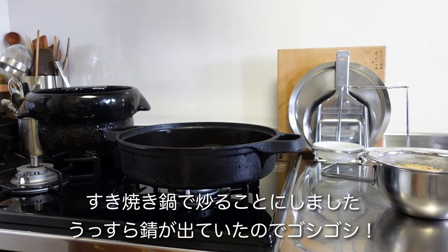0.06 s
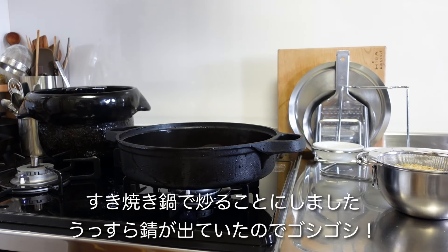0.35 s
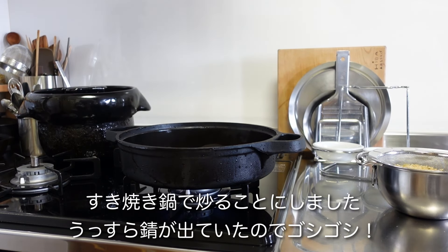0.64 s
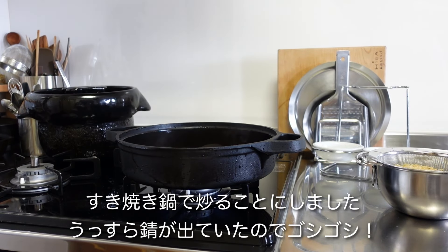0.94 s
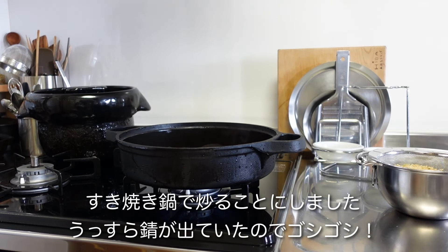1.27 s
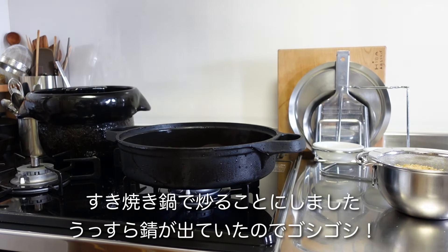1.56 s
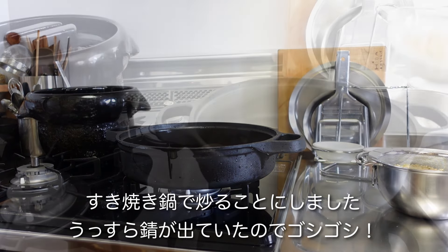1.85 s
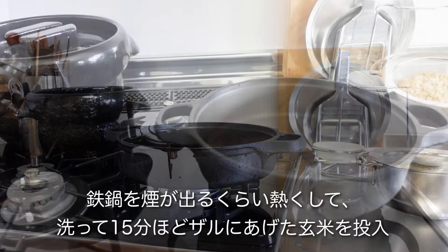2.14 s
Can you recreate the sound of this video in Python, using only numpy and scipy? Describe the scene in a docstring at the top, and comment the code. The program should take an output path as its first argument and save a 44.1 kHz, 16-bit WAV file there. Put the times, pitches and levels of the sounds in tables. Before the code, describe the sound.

An igniter snaps rapidly, burner and extractor hood roar softly, and wet rice tipped from a steel strainer builds to a loud sizzle.

```python
"""A knob clicks, gas hisses softly and an igniter snaps 7.5 times a second: a gas hob in a small
kitchen, heard from close by on a pair of microphones. Abruptly burner and extractor hood are roaring.
Just right of centre, wet rice rattles out of a ringing steel strainer into a hot iron pot, where the
water on the grains bursts into steam and builds up to a loud sizzle."""
import sys
import numpy as np
from scipy import signal
from scipy.fft import rfft, irfft, next_fast_len
from scipy.io import wavfile
from scipy.ndimage import uniform_filter1d

SR = 44100
rng = np.random.default_rng(int(sys.argv[2]) if len(sys.argv) > 2 else 0)


def store_wav(level_fs):
    """Save 16-bit WAV to argv[1]."""
    pcm = np.round(np.clip(np.atleast_2d(level_fs), -1, 1) * 32767)
    wavfile.write(sys.argv[1], SR, pcm.T.astype(np.int16))


N = 257103
TIME = np.arange(N) / SR
LEFT_RIGHT = np.array([[1], [-1]])
ROAR_START_S = 2.139

# clumps of wet rice landing on hot iron: start_s, level_db
RICE_CLUMPS = [(3.85, -37), (3.96, -41), (4.075, -43.5), (4.235, -42.5), (4.29, -44)]
# spectrum of the bursting steam bubbles: pitch_hz, level_db
SIZZLE_SPECTRUM = [(150, -49), (400, -30), (700, -15), (1000, -11.5), (1500, -9.5), (1900, -7.5),
                   (2300, -9), (2700, -6.5), (3700, -3), (5200, -1), (7000, -3), (10000, -8),
                   (13000, -16.5), (16000, -29.5)]
# sizzle treble against its lows, dulled at last by the growing heap: time_s, tilt_db
SIZZLE_TILT = [(3.9, 1), (4.3, 4.5), (4.95, 1), (5.3, -3.5)]
# resonances of the iron pot: pitch_hz, width_hz, lift_db
POT_MODES = [(435, 40, 5), (1238, 65, 9.5), (1674, 32, 8.5), (1780, 60, 3), (2600, 70, 3), (2930, 70, 3),
             (3187, 35, 4), (3346, 28, 6), (3526, 28, 6.5), (3755, 45, 5), (3912, 30, 6.5), (4086, 22, 5.5),
             (4258, 40, 3), (4454, 35, 3.5), (5124, 40, 4), (5335, 55, 4), (5669, 40, 3), (5849, 25, 3),
             (7603, 30, 4), (8708, 45, 3)]
# the pot's place between the microphones: pitch_hz, left_minus_right_db
POT_BALANCE = [(300, -1), (2400, -0.5), (4400, -1.5), (8000, -2), (14000, 3)]
# jolts that send rice out of the strainer: start_s, knock_db, flow_db, rise_s, hold_s, t60_s
STRAINER_JOLTS = [(3.83, -47, -30.5, 0.025, 0.021, 0.37), (4.202, -52, -33, 0.0098, .003, .11),
                  (4.314, -59, -40.5, 0.0052, .003, .08)]
# modes of the steel strainer: pitch_hz, level_db, t60_s
STRAINER_MODES = [(760, -3, .15), (1264, -5, .3), (2733, 1, .28), (2787, 2, .3), (3020, -3, .25),
                  (3377, 0, .25), (3472, -1, .2), (3546, -1, .2), (3750, -3, .2), (4008, 1, .25),
                  (4143, 2, .3), (4450, -2, .2), (5103, 0, .3), (6146, -2, .22), (6567, -2, .22),
                  (7360, -1, .22), (7800, -6, .2), (8705, -3, .2), (9150, -4, .2), (10200, -7, .15),
                  (12000, -13, .12)]
# spectrum of rice rattling over steel: pitch_hz, level_db
RATTLE_SPECTRUM = [(290, -50), (500, -17), (761, -11), (1160, -10), (1280, 1), (1440, -8), (2070, -3),
                   (4030, -1), (4400, -4.5), (8960, -1), (16000, -17.5)]
# near echoes of a spark off hob top and pot: delay_s, level_db
SPARK_ECHOES = [(.00041, -.5), (.0031, -13), (.0067, -11)]
# the crack a spark sends into the room: pitch_hz, level_db
SPARK_SPECTRUM = [(150, -45), (450, -39), (750, -21), (1050, -17), (1400, -9.5), (2400, -5.5), (3300, -1.5),
                  (4300, 2), (5400, 2.5), (6600, 1), (8500, 0), (11000, -1.5), (16000, -10)]
# bright clicks of the knob and its catch: start_s, level_db, t60_s
KNOB_CLICKS = [(.022, -58, 0.089), (.111, -55.5, 0.025), (.128, -61, .1), (0.1466, -42.5, 0.063),
               (.280, -35, 0.0057), (.41, -31.5, 0.011)]
# dull knocks of valve and cookware: start_s, level_db, highest_hz, t60_s
DULL_KNOCKS = [(.022, -52, 3700, .16), (.150, -56, 2000, 0.14), (.195, -47.5, 2600, 0.075),
               (.41, -55.5, 1350, .2), (.457, -49.5, 1600, 0.23), (.577, -47.5, 1540, 0.062),
               (.586, -56, 450, 0.03), (1.269, -63, 2000, .2), (1.339, -53.5, 2500, 0.36),
               (1.383, -50.5, 2250, 0.14), (2.251, -48.5, 1800, 0.21), (3.677, -46, 3000, .034),
               (5.527, -48, 440, .058), (5.695, -46, 486, 0.081)]
# faint clink of metal as the roar sets in: pitch_hz, level_db, t60_s
CLINK_MODES = [(2870, -54, 0.23), (3720, -55, 0.16)]
# light scuffs of steel and grain: peak_s, level_db, pitch_hz, width_hz, rise_s, t60_s
SCUFFS = [(1.578, -54, 6800, 1100, .0084, 0.24), (1.572, -66, 5960, 8500, 0.0054, 0.49),
          (2.275, -61.5, 6100, 5200, 0.0092, 0.23), (2.828, -59, 5500, 2800, 0.0086, 0.15),
          (3.705, -57.5, 6000, 4500, 0.011, 1), (3.745, -44.5, 5280, 2100, 0.014, .41),
          (4.363, -38, 6770, 700, .002, 0.037), (4.605, -43, 9050, 4700, 0.018, 0.19)]
# spectrum of flame and extractor hood: pitch_hz, level_db
ROAR_SPECTRUM = [(25, -30), (48, -32), (65, -5.5), (90, -0.5), (150, -0.5), (200, -6), (420, -2),
                 (1150, -0.5), (1700, -5.5), (3000, -11), (4500, -17.5), (7000, -25.5), (10000, -45),
                 (16000, -71)]
# resonances in the roar: pitch_hz, width_hz, lift_db
ROAR_MODES = [(149, 9.5, 6), (414, 19, 8), (669, 19, 7), (837, 19, 9), (1038, 73, 4), (1226, 96, 4.5)]
# loudness of the unlit gas at the jet: time_s, level_db
GAS_LEVEL = [(0, -69.5), (.3, -67.5), (1.5, -65.5), (2.13, -71.5)]
# spectrum of the gas hiss: pitch_hz, level_db
GAS_SPECTRUM = [(300, -51), (900, -9), (1600, -1.5), (2500, -3), (3500, 3.5), (5200, 2.5), (7000, -4),
                (9000, -25), (11000, -18), (16000, -32)]
# whistles of the jet: pitch_hz, width_hz, lift_db
GAS_WHISTLES = [(1100, 170, 9), (2080, 130, 4), (2630, 130, 8), (3330, 120, 9.5), (3740, 130, 9),
                (4544, 69, 9), (4750, 90, -1), (5600, 120, 3), (11100, 220, 7)]
# room tone of the quiet kitchen: pitch_hz, level_db
ROOM_TONE_SPECTRUM = [(25, -24), (60, -10), (110, 2.5), (250, 1.5), (700, 4), (2000, -3), (6000, -4.5),
                      (16000, -17)]
# reverberation time of the kitchen: pitch_hz, t60_s
KITCHEN_DECAY = [(150, 0.67), (1300, 0.4), (3500, 0.3), (9000, .3), (15000, 0.2)]
# stereo width at the microphone pair: pitch_hz, side_against_mid_db
STEREO_WIDTH = [(60, -44), (130, -25), (300, -14.5), (700, -13.5), (1500, -12), (2500, -13), (4400, -10),
                (8000, -6.5), (15000, -3)]


def sizzle(tail, split_hz=5000, spits_db=-5, spits_fade_db_per_s=7.5):
    """Countless steam bubbles burst under the rice, with single spits, all coloured by the pot."""
    bubbles = stereo_grains(20000, spread_db=3.0, side_db=-6.5)
    fizz = rms_one(colour(bubbles, SIZZLE_SPECTRUM, POT_MODES))
    pops = in_room(grains(350, spread_db=2.4), tail, wet_db=-1.0)
    spits = rms_one(colour(pops, SIZZLE_SPECTRUM, POT_MODES))
    frying_s = np.maximum(TIME - RICE_CLUMPS[0][0], 0)
    spits_gain = from_db(spits_db - spits_fade_db_per_s * frying_s)   # loose drops are used up
    boil = steam_rate() * (fizz + spits_gain * spits)
    lows = signal.sosfiltfilt(signal.butter(1, split_hz, fs=SR, output="sos"), boil)
    tilt = from_db(in_time(SIZZLE_TILT) / 2)
    return lows / tilt + (boil - lows) * tilt


def steam_rate(boil_s=4.697, boil_db=-29, rise_s=0.095, ease_db_per_s=3):
    """Boiling as a gain: each clump flares up, then the whole heap boils and eases as it dries."""
    flares = [from_db(db) * swell(s, rise_s=0.016, hold_s=0.032, t60_s=1) for s, db in RICE_CLUMPS]
    since = TIME - boil_s
    heap = from_db(boil_db - ease_db_per_s * since) / (1 + np.exp(-since / rise_s))
    return np.sqrt(heap ** 2 + sum(flare ** 2 for flare in flares))


def strainer(tail, rattle_db=-3.0, rub_db=-14.0):
    """At each jolt grains rattle into the pot; they and the knock ring the strainer's steel."""
    flow = sum(from_db(db) * swell(s, rise, hold, t60) for s, _, db, rise, hold, t60 in STRAINER_JOLTS)
    rice = stereo_grains(9000, spread_db=0.5, side_db=-2.5)
    rattle = flow * rms_one(colour(rice, RATTLE_SPECTRUM))
    taps = impulses([jolt[:2] for jolt in STRAINER_JOLTS])
    flow_rms = np.sqrt(np.mean(flow ** 2))
    steel = 0
    for hz, db, t60 in STRAINER_MODES:
        # many small impacts keep each mode sounding in proportion to the flow
        rubbed = flow_rms * rms_one(ring(flow * grains(3000, spread_db=3.0), hz, t60))
        struck = ring(taps, hz, t60) * rng.choice([-1, 1])
        steel += from_db(db) * (from_db(rub_db) * rubbed + struck)
    return from_db(rattle_db) * rattle + in_room(steel, tail, wet_db=-12.0)


def igniter(tail, first_s=.2724, period_s=.13213, count=9, sag_db_per_s=1.95):
    """Each spark arrives as a sharp pressure pulse with near echoes; the room gets a broader crack."""
    sparks = impulses([(first_s + s, -20.5 - sag_db_per_s * s) for s in period_s * np.arange(count)])
    bright_snap = -band(sparks, low_hz=3270, high_hz=10100)
    low_crack = from_db(-12.5) * band(sparks, low_hz=920, high_hz=1850)
    snap = bright_snap + low_crack
    echoes = sum(from_db(db) * np.interp(TIME - delay, TIME, snap) for delay, db in SPARK_ECHOES)
    room = reverberation(colour(sparks, SPARK_SPECTRUM), tail)
    return from_db(8.0) * (snap + echoes) + from_db(13.5) * room


def knocks(tail, click_band_hz=(2300, 8600), knock_low_hz=186):
    """Knob, valve and cookware click, knock and clink close by, and the kitchen carries them on."""
    bright = sum(clatter(s, db, *click_band_hz, t60) for s, db, t60 in KNOB_CLICKS)
    dull = sum(clatter(s, db, knock_low_hz, high_hz, t60) for s, db, high_hz, t60 in DULL_KNOCKS)
    clink = sum(ring(impulses([(ROAR_START_S, db)]), hz, t60) for hz, db, t60 in CLINK_MODES)
    return in_room(bright + dull + clink, tail, wet_db=-2.5)


def clatter(start_s, db, low_hz, high_hz, t60):
    """One short dead knock: its many close modes blur into a fading band of noise."""
    t = TIME[:SR // 4]
    fade = from_db(-60 * t / t60)
    burst = rms_one(band(rng.standard_normal(len(t)) * fade, low_hz, high_hz, order=3))
    burst *= from_db(db) * np.sqrt(np.mean(fade ** 2))
    start, out = int(start_s * SR), np.zeros(N)
    out[start:start + len(t)] = burst[:N - start]
    return out


def scuffs():
    """Brief rubs of steel and grain each swell in one resonance and die away."""
    out, noise = np.zeros((2, N)), diffuse()
    for peak_s, db, hz, width, rise, t60 in SCUFFS:
        span = slice(int((peak_s - .1) * SR), int((peak_s + .5) * SR))
        t = TIME[span] - peak_s
        shape_db = np.where(t < 0, -4 * (t / rise) ** 2, -60 * t / t60)
        low_hz = np.hypot(hz, width / 2) - width / 2
        out[:, span] += from_db(db + shape_db) * rms_one(band(noise[:, span], low_hz, low_hz + width))
    return out


def burner_and_hood(steady_db=-51, surge_db=4.5, settle_s=0.13, hiss_db=-56, hiss_settle_s=0.044):
    """Flame and extractor hood roar in with a surge and settle; the fresh flame hisses briefly."""
    since = np.maximum(TIME - ROAR_START_S, 0)
    roar = rms_one(colour(diffuse(side_db=-0.5), ROAR_SPECTRUM, ROAR_MODES))
    roar_gain = from_db(steady_db + surge_db * np.exp(-since / settle_s))
    hiss = rms_one(band(diffuse(), low_hz=4200, high_hz=9900))
    hiss_gain = from_db(hiss_db) / (1 + (since / hiss_settle_s) ** 1.24)
    return (TIME > ROAR_START_S) * (roar_gain * roar + hiss_gain * hiss)


def gas_jet():
    """Unlit gas hisses and whistles softly through the jet until the roar starts."""
    hiss = rms_one(colour(diffuse(), GAS_SPECTRUM, GAS_WHISTLES))
    return (TIME <= ROAR_START_S) * from_db(in_time(GAS_LEVEL)) * hiss


def room_tone(level_db=-77.5):
    """The quiet kitchen, all round the microphones."""
    return from_db(level_db) * rms_one(colour(diffuse(), ROOM_TONE_SPECTRUM))


def kitchen_tail():
    """The room's answer to a click, with unit energy; the treble dies first."""
    size = SR // 2
    t, hz = TIME[:size], np.arange(size // 2 + 1) * SR / size
    noise, tail = rfft(diffuse(size=size, side_db=0.5)), 0
    for centre, t60 in KITCHEN_DECAY:
        share = at_hz([(f, f == centre) for f, _ in KITCHEN_DECAY], hz)
        tail += irfft(noise * share, size) * from_db(-60 * t / t60)
    spectrum = rfft(tail)
    power = uniform_filter1d(np.mean(np.abs(spectrum) ** 2, axis=0), size=21)
    even_tail = irfft(spectrum / np.sqrt(power), size)   # the room's many modes favour no pitch
    return rms_one(even_tail * (t > .001) * (t < .45)) / np.sqrt(size)


def reverberation(x, tail):
    """What the room gives back to the two microphones."""
    return signal.fftconvolve(np.atleast_2d(x), tail, axes=1)[:, :N]


def in_room(x, tail, wet_db):
    """Direct sound plus reverberation."""
    return x + from_db(wet_db) * reverberation(x, tail)


def diffuse(size=N, side_db=0):
    """Noise from all round at two close microphones: alike in the bass, less so in the treble."""
    mid, side = rng.standard_normal((2, size))
    return rms_one(mid + from_db(side_db) * LEFT_RIGHT * colour(side, STEREO_WIDTH))


def stereo_grains(per_s, spread_db, side_db):
    """Impulses from all over the pot's floor reach the two microphones a little differently."""
    mid, side = grains(per_s, spread_db), grains(per_s, spread_db)
    return mid + from_db(side_db) * LEFT_RIGHT * colour(side, STEREO_WIDTH)


def grains(per_s, spread_db):
    """Tiny random impulses, a few stronger than the rest."""
    sizes = from_db(spread_db * np.minimum(rng.exponential(1, N), 4)) * rng.choice([-1, 1], N)
    return rms_one(sizes * (rng.random(N) < per_s / SR))


def impulses(rows):
    """One impulse for each row of start_s, level_db."""
    out = np.zeros(N)
    for s, db in rows:
        out[int(s * SR)] += from_db(db)
    return out


def swell(start_s, rise_s, hold_s, t60_s):
    """Gain that rises straight to 1, holds, then dies away."""
    since = TIME - start_s
    decay_db = -60 * np.clip((since - rise_s - hold_s) / t60_s, 0, 3)
    return np.clip(since / rise_s, 0, 1) * from_db(decay_db)


def ring(x, hz, t60):
    """One mode: a unit impulse sets off a dying sine of height 1."""
    radius, angle = from_db(-60 / (t60 * SR)), 2 * np.pi * hz / SR
    return signal.lfilter([0, np.sin(angle)], [1, -2 * radius * np.cos(angle), radius ** 2], x + 1e-18)


def colour(x, spectrum, resonances=()):
    """Filter by a smooth spectrum with resonant peaks on it."""
    size = next_fast_len(x.shape[-1], real=True)
    hz = np.arange(size // 2 + 1) * SR / size
    peaks_db = sum(lift / (1 + (2 * (hz - f) / width) ** 2) for f, width, lift in resonances)
    return irfft(rfft(x, size) * from_db(at_hz(spectrum, hz) + peaks_db), size)[..., :x.shape[-1]]


def band(x, low_hz, high_hz, order=2):
    """Causal band-pass."""
    return signal.sosfilt(signal.butter(order, [low_hz, high_hz], "band", fs=SR, output="sos"), x + 1e-18)


def at_hz(curve, hz):
    """Read a curve on a log-frequency axis."""
    pitches, values = np.transpose(curve)
    return np.interp(np.log(np.maximum(hz, 1)), np.log(pitches), values)


def in_time(curve):
    """Read a curve at every sample."""
    return np.interp(TIME, *np.transpose(curve))


def from_db(db):
    """Decibels to gain."""
    return 10 ** (np.asarray(db) / 20)


def rms_one(x):
    """Scale to unit power."""
    return x / np.sqrt(np.mean(x ** 2) + 1e-20)


def scene():
    """The microphones face the hob, the pot slightly to their right; all shares one kitchen."""
    tail = kitchen_tail()
    left, right = sizzle(tail) + strainer(tail)
    pot = np.array([colour(left, [(hz, db / 2) for hz, db in POT_BALANCE]),
                    colour(right, [(hz, -db / 2) for hz, db in POT_BALANCE])])
    return pot + igniter(tail) + knocks(tail) + scuffs() + room_tone() + gas_jet() + burner_and_hood()


def record(dry):
    """Both microphone channels lose the very top to a steep low-pass."""
    cutoff_hz = 16100
    return signal.sosfilt(signal.ellip(10, .1, 80, cutoff_hz, fs=SR, output="sos"), dry)


dry = scene()
out = record(dry)
store_wav(out)
```